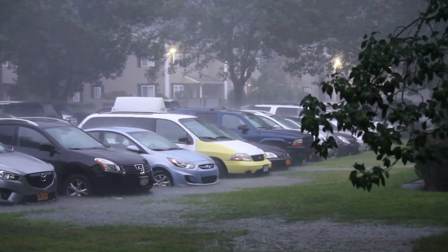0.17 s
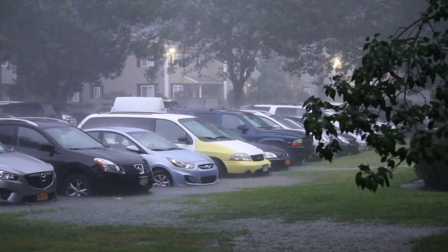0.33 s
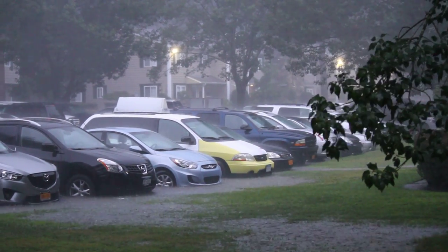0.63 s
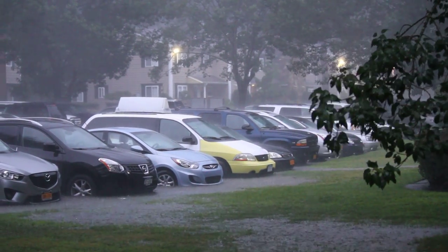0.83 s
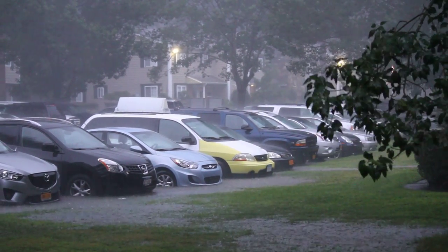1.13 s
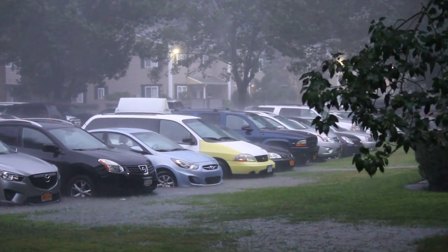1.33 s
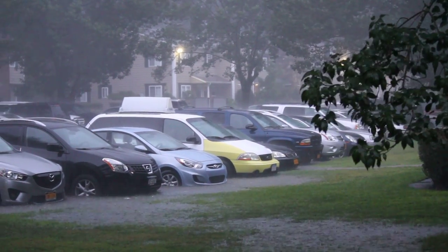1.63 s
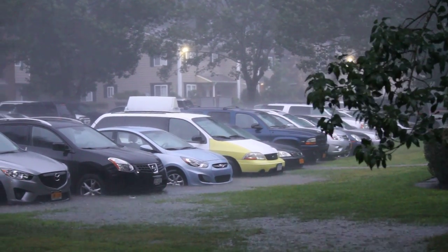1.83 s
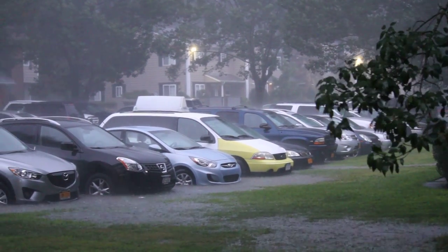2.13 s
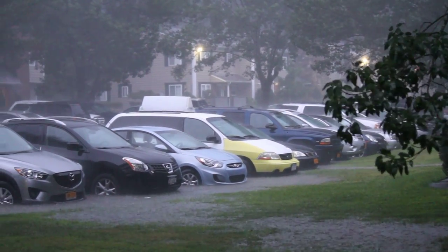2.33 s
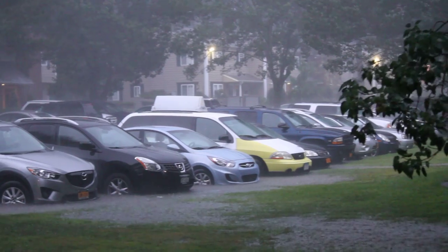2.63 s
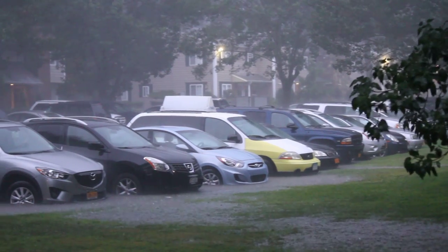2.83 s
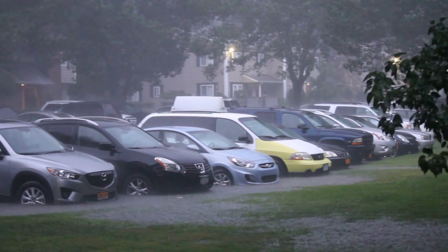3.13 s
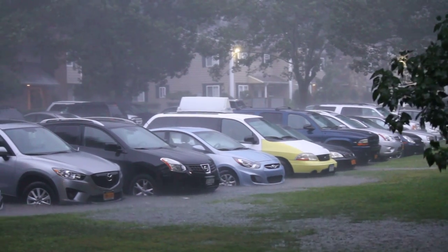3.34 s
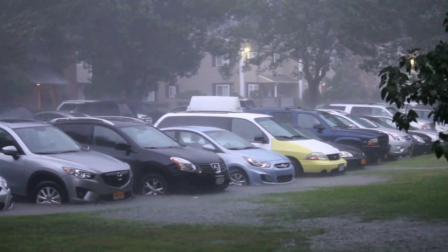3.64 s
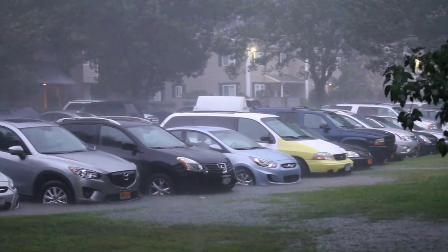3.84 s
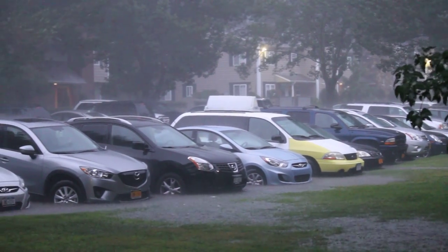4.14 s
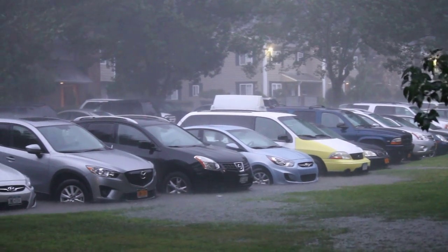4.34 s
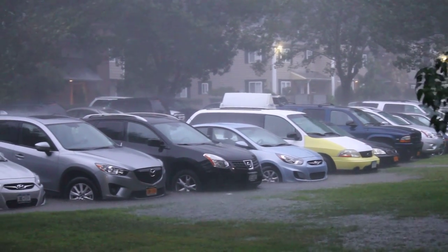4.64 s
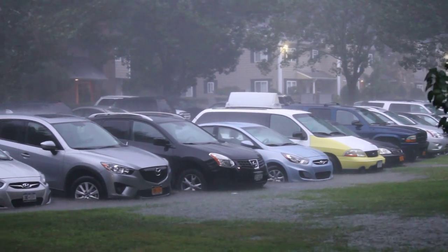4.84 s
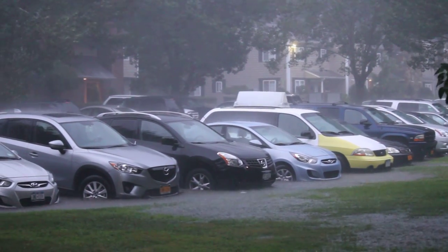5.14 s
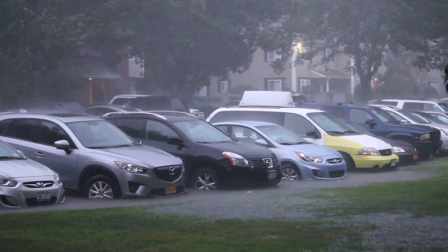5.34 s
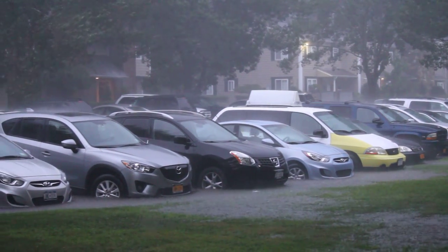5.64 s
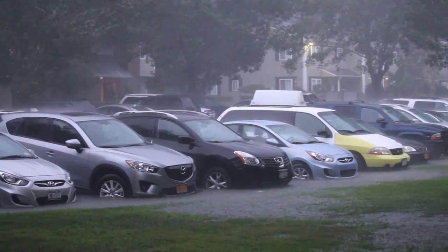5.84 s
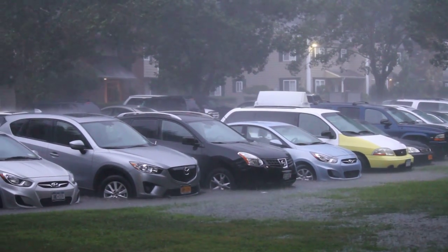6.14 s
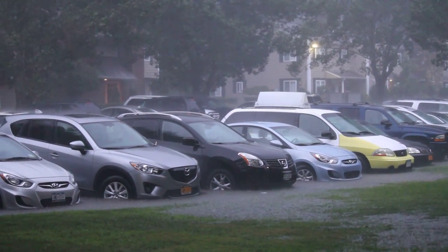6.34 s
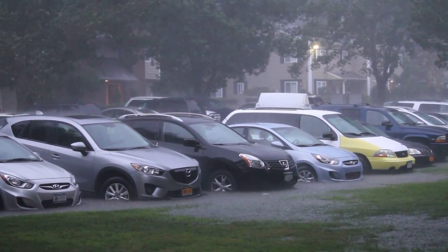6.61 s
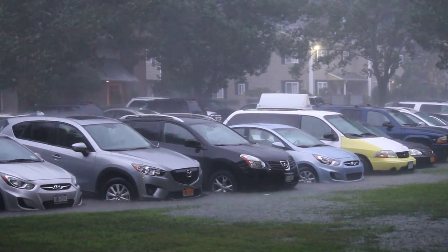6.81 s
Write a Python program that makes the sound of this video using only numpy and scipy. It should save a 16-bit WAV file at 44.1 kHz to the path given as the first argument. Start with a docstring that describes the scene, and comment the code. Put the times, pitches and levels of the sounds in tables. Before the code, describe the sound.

Outdoors in a heavy cloudburst, steady bright rain noise fills everything from start to finish. Close, crisp ticks and short wet splashes strike irregularly over fine fizzing patter on water, leaves and paint. Farther off, rain blends into a grainy roar, with muted low drumming on car roofs and a barely audible hum. The camera microphone briefly ducks the rain after hard hits.

```python
"""Torrential rain on parked cars and a flooded lot, microphone beside a tree.
Far off, countless drops merge into a wash of coloured noise that swells with each sheet of rain.
Nearer, tiny damped rings patter, showers of droplets splat and splash, and hard drops tick like short sines.
Car panels drum dully underneath as low noise, and a faint narrow hum lies below it all.
Loud peaks, above all the hard drops close by, make the camera's gain control duck the whole downpour."""
import sys
import numpy as np
from scipy import signal
from scipy.fft import rfft, irfft, next_fast_len
from scipy.io import wavfile
from scipy.ndimage import uniform_filter1d, map_coordinates

SR = 44100
rng = np.random.default_rng(int(sys.argv[2]) if len(sys.argv) > 2 else 0)


def dump(signal):
    """Clip the signal to [-1, 1] and save it as 16-bit WAV at the path in sys.argv[1]."""
    limited = np.clip(np.atleast_2d(signal).T, -1, 1)
    pcm = np.round(limited * 32767).astype(np.int16)
    wavfile.write(sys.argv[1], SR, pcm)


N = 307377  # length in samples

# Strength of the downpour, before each layer's own trim:
# t/s, level of the near hiss/dB, level of the far body relative to the hiss/dB
DOWNPOUR_STRENGTH = [(0.0, -17, -11), (0.44, -19.5, -8.5), (1.0, -17.5, -9), (1.5, -19.5, -10.1),
                     (1.68, -17.5, -9.5), (2.05, -19.5, -9.5), (2.34, -21, -9.5), (2.67, -18.5, -8.5),
                     (3.15, -19.5, -9.5), (3.23, -16.5, -10), (3.7, -18, -10), (4.22, -18.5, -9.5),
                     (4.52, -18, -9), (4.98, -19.5, -9.5), (6.1, -17.5, -10), (6.43, -19, -9.0),
                     (6.67, -16, -8.5), (6.97, -19.5, -10)]
# Single hard drops close to the microphone, before ducking: t/s, peak level of the tick/dB, f/Hz
HARD_DROPS = [(0.186, -1.5, 10950), (0.2398, -2, 5600), (0.4587, 0, 12000), (0.508, 1.5, 8500),
              (0.815, -2.5, 6100), (1.139, 0.5, 11000), (1.2636, 0.8, 6900), (1.3972, -0.5, 11700),
              (1.6708, 0.3, 6550), (1.9014, -2, 9200), (2.1201, -1.2, 12000), (2.1778, 2, 10300),
              (2.884, -0.2, 10000), (3.411, -0.6, 6900), (3.5212, 0.7, 5200), (3.8158, 2, 5950),
              (4.0626, 3, 10300), (4.1309, 3.5, 5200), (4.3369, 0.5, 5240), (4.4724, 0, 7700),
              (4.7258, -3.5, 9800), (4.7818, 0, 6200), (4.9882, 1.3, 6500), (6.03, 3, 11500),
              (6.4135, -4, 6500), (6.7305, -1.8, 6000)]
# Fat drops bursting into spray close by, before ducking: t/s, level/dB, centre f/Hz
FAT_DROPS = [(0.077, -22, 3900), (0.264, -19, 4000), (0.456, -20, 11500), (0.632, -17, 5450),
             (0.813, -19.5, 6540), (1.089, -19, 1850), (1.34, -17.5, 5450), (1.66, -20.5, 3000),
             (1.77, -20.5, 2900), (2.106, -22, 11500), (2.834, -19, 4300), (3.218, -21, 6000),
             (3.245, -22, 3500), (3.298, -19.5, 3500), (3.373, -17.5, 6570), (3.916, -15.5, 9540),
             (4.0, -20.5, 7900), (4.617, -24.5, 804), (5.334, -22, 2000), (5.43, -21.5, 3580),
             (5.534, -18.5, 6570), (5.665, -20, 4200), (5.728, -21, 3400), (6.009, -21, 11500),
             (6.286, -18, 3200), (6.72, -24.5, 726), (6.917, -21, 2140)]
# Colour of the rain over the whole lot, relative: f/Hz, level per Hz/dB
WASH_COLOUR = [(20, -42), (45, -28), (70, -17), (130, -17), (270, -9.5), (350, -5.5), (430, -5.5),
               (700, -3.5), (1500, 1), (2300, -1), (4000, -9.5), (9000, -6.5), (16000, -22)]
# Colour of the near patter, relative: f/Hz, level per Hz/dB
PATTER_COLOUR = [(40, -63), (300, -26), (1200, -15), (2300, -7), (3450, -2), (4500, -2.5), (5800, -1.95),
                 (8600, -5), (10500, -1.5), (12200, 0.5), (13300, -3), (15700, -12.5)]
# Colour of the drumming car panels, relative: f/Hz, level per Hz/dB
PANEL_COLOUR = [(25, -48), (68, -20), (84, -10.5), (105, -12.5), (155, -2), (190, -1), (222, 0), (240, -8),
                (400, -9), (900, -22.5)]

TOP_HZ = 15800  # the camera's band limit
SPLASH_RISE_S = 0.0059  # time for a splash to reach its peak
DUCK_ABOVE_DB, DUCK_ATTACK_S, DUCK_RELEASE_S = -4, 0.033, 0.095  # the camera's gain control


def amp(db):
    """Decibels to gain."""
    return 10 ** (np.asarray(db) / 20)


def unit(x):
    """x at rms 1."""
    return x / np.sqrt(np.mean(x ** 2) + 1e-20)


def curves(rows):
    """One value per sample for each column after the time."""
    times_s, *columns = np.transpose(rows)
    return [np.interp(np.arange(N) / SR, times_s, column) for column in columns]


def wobble(rate):
    """A smooth random curve, rate knots a second."""
    knots = rng.standard_normal(int(N * rate / SR) + 4)
    return map_coordinates(knots, [np.arange(N) * rate / SR])


def filtered(x, response):
    """x times a response of frequency."""
    size = next_fast_len(len(x) + 8192)
    spectrum = rfft(x, size) * response(np.fft.rfftfreq(size, 1 / SR))
    return irfft(spectrum, size)[:len(x)]


def coloured(x, colour):
    """x shaped by (f/Hz, level/dB) points on a log axis, at rms 1."""
    hz, db = np.transpose(colour)
    return unit(filtered(x, lambda f: amp(np.interp(np.log(f + 1), np.log(hz), db))))


def band(x, hz, octaves):
    """x through a bell around hz, at rms 1."""
    return unit(filtered(x, lambda f: np.exp(-.5 * (np.log2((f + 1) / hz) / octaves) ** 2)))


def add(track, s, sound):
    """Mix a sound into the track at time s, cut off where the track ends."""
    part = track[max(round(s * SR), 0):][:len(sound)]
    part += sound[:len(part)]


def patchy(x, depth_db, size):
    """Drops fall in clumps: x under random gains, smooth over size = (bins, frames)."""
    z = signal.stft(x, nperseg=256)[2]
    field = rng.standard_normal(z.shape)
    for axis in (0, 1, 0, 1):
        field = uniform_filter1d(field, size[axis], axis, mode="wrap")
    gains = amp(depth_db * unit(field))
    return signal.istft(z * gains, nperseg=256)[1][:N]


def impacts(count, life_s, spread_db, size=48):
    """Tiny damped rings at random times and pitches; the nearer a drop lands, the louder it is."""
    t = np.arange(size) / SR
    start, pitch, life, distance = rng.random((count, 4)).T[:, :, None]
    gain = amp(-spread_db * np.log(np.maximum(distance, 1 / 100)))
    tone = np.sin(np.pi * SR * pitch * t)  # anywhere from 0 to SR / 2
    rings = gain * tone * np.exp(-t / (life_s * (.5 + life)))
    places = (start * N).astype(int) + np.arange(size)
    return unit(np.bincount(places.ravel(), rings.ravel(), N)[:N])


def reflected(x, echo_db, count=8):
    """Car sides and the wet ground return weak copies within a few hundredths of a second."""
    out = x.copy()
    for delay_s in rng.uniform(.002, .03, count):
        add(out, delay_s, amp(echo_db) * x)
    return out


def far_wash(body_db):
    """Far off, rain over the whole lot merges into a roar with a little grain left in it."""
    drops = rng.standard_normal(N) + amp(-8.5) * impacts(count=6000, life_s=0.00018, spread_db=1.0)
    roar = reflected(patchy(drops, depth_db=1.02, size=(4, 10)), echo_db=-27)
    return amp(body_db + 1.64) * coloured(roar, WASH_COLOUR)


def patter(hiss_db):
    """Nearer, drops smack on standing water, leaves and paint over a fine fizz of spray."""
    fizz = amp(3.5) * rng.standard_normal(N)
    drops = impacts(count=30000, life_s=0.00015, spread_db=3.0) + fizz
    clumps = patchy(drops, depth_db=0.97, size=(14, 5))
    return amp(hiss_db + 0.52 + 0.5 * wobble(70)) * coloured(clumps, PATTER_COLOUR)


def car_panels(body_db):
    """Roofs and bonnets drum under the same sheets of rain: low noise with an unsteady level."""
    return amp(body_db - 16.0 + 1.9 * wobble(10)) * coloured(rng.standard_normal(N), PANEL_COLOUR)


def hum():
    """A faint, unsteady low hum from far off: a very narrow band of noise."""
    return amp(-64) * band(rng.standard_normal(N), hz=53.5, octaves=0.066)


def burst(hz, rise_s, octaves):
    """One fat drop's spray, a shower of droplets: it rises fast and dies in some tens of milliseconds."""
    t = np.arange(SR // 10) / SR
    droplets = rng.standard_normal(len(t)) * (rng.random(len(t)) < .15)
    swell = t / rise_s * np.exp(1 - t / rise_s)  # peaks at 1 when t = rise_s
    return band(droplets, hz, octaves) * swell


def splatter(hiss_db, count=130):
    """Fat drops shed by the tree splat irregularly all around, each a short burst of spray."""
    out = np.zeros(N)
    for when, pitch, size, life in rng.random((count, 4)):
        spray = burst(1500 * 4.5 ** pitch, rise_s=0.0044 * (.5 + life), octaves=0.43)
        add(out, when * N / SR, amp(7.5 * (size - 1) + 4 * pitch) * spray)
    return amp(hiss_db - 6.5) * out


def splashes():
    """Fat drops land close by: bright on water and leaves, hollow on the cars."""
    out = np.zeros(N)
    for s, db, hz in FAT_DROPS:
        # a low knock rings in a panel, so it is narrower than open spray
        octaves = .25 if hz < 1000 else .45
        add(out, s, amp(db) * burst(hz, SPLASH_RISE_S, octaves))
    return out


def near_drops(life_s=0.00016, spatter_s=0.0057, spatter_db=-20):
    """Close to the microphone, each is a sharp, light tick, then a few milliseconds of droplets."""
    out, t = np.zeros(N), np.arange(SR // 40) / SR
    for s, db, hz in HARD_DROPS:
        no_bass = signal.butter(2, hz / 2, "highpass", fs=SR)
        tick = signal.lfilter(*no_bass, np.sin(2 * np.pi * hz * t) * np.exp(-t / life_s))
        droplets = band(rng.laplace(size=len(t)), hz, octaves=.45)
        spatter = amp(spatter_db) * droplets * np.exp(-t / spatter_s)
        add(out, s, amp(db) * (tick / np.abs(tick).max() + spatter))
    return out


def gain_control(x):
    """Each peak over the threshold pulls the gain down towards its excess; the gain then creeps back."""
    excess_db = np.maximum(20 * np.log10(np.abs(x) + 1e-9) - DUCK_ABOVE_DB, 1e-9)
    # a running maximum on a tilted log axis: each excess is held, dying away exponentially
    fade = np.arange(N) / SR / DUCK_RELEASE_S
    held_db = np.exp(np.maximum.accumulate(np.log(excess_db) + fade, axis=-1) - fade)
    # a one-pole lag sets how fast the gain follows
    step = 1 / (DUCK_ATTACK_S * SR)
    duck_db = signal.lfilter([step], [1, step - 1], held_db)
    return x * amp(-duck_db)


def scene():
    """Wash, patter, splatter and panels follow the downpour; hum, splashes and hard drops do not."""
    hiss_db, body_rel_db = curves(DOWNPOUR_STRENGTH)
    body_db = hiss_db + body_rel_db
    sheets = far_wash(body_db) + patter(hiss_db) + splatter(hiss_db) + car_panels(body_db)
    return (sheets + hum() + splashes() + near_drops())[None]


def record(dry):
    """The camera ducks after loud peaks, rounds off the sharpest and keeps nothing above its band limit."""
    ducked = gain_control(dry)
    rounded = ducked / (1 + np.abs(ducked / .72) ** 6) ** (1 / 6)
    return np.array([filtered(channel, lambda hz: hz < TOP_HZ) for channel in rounded])


dry = scene()
out = record(dry)
dump(out)
```